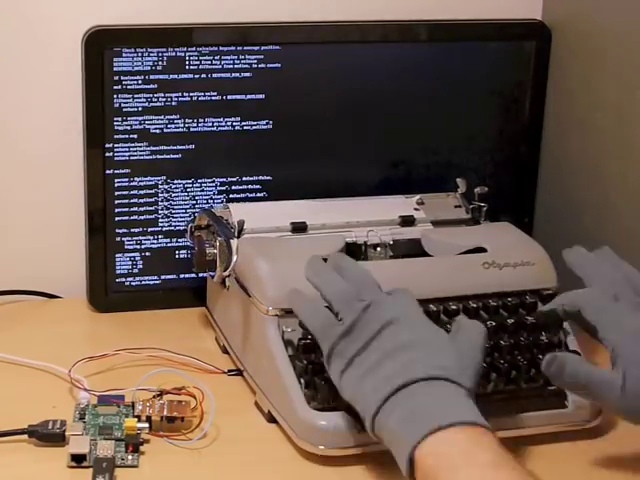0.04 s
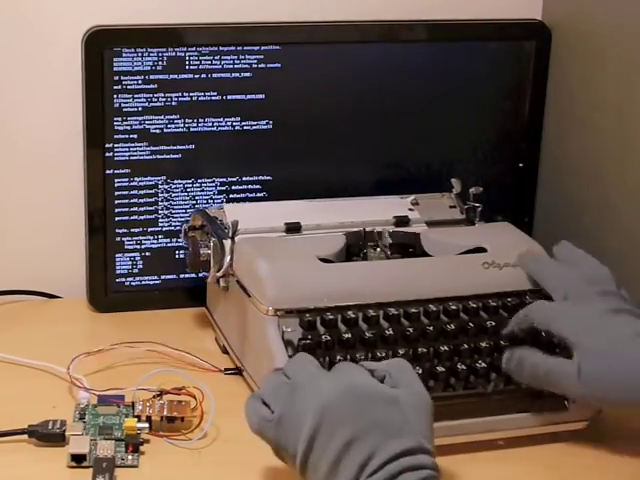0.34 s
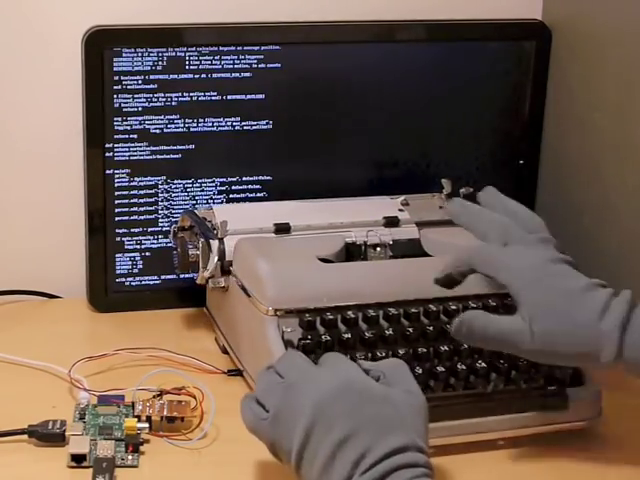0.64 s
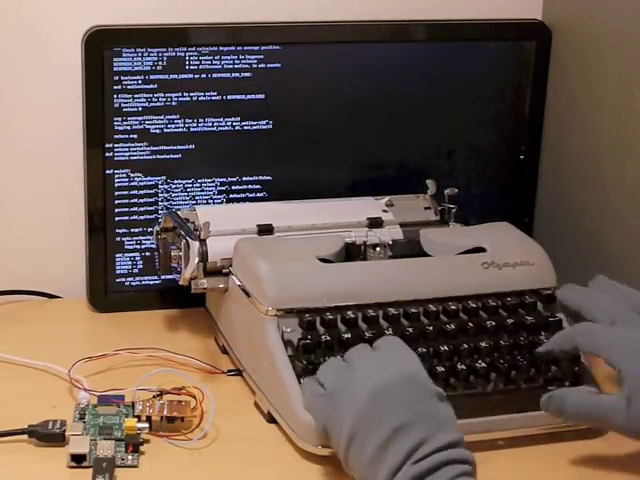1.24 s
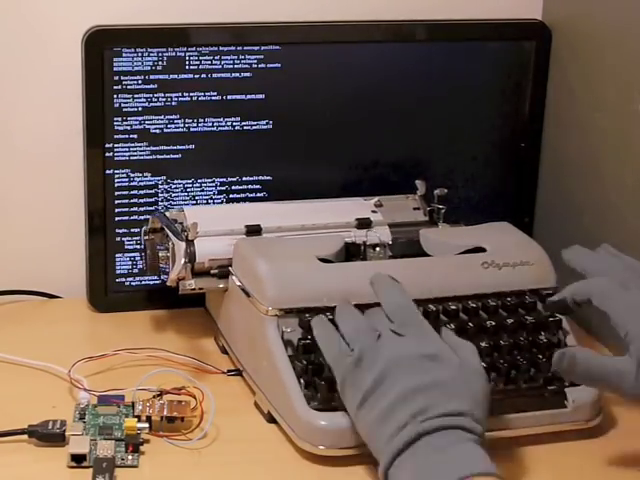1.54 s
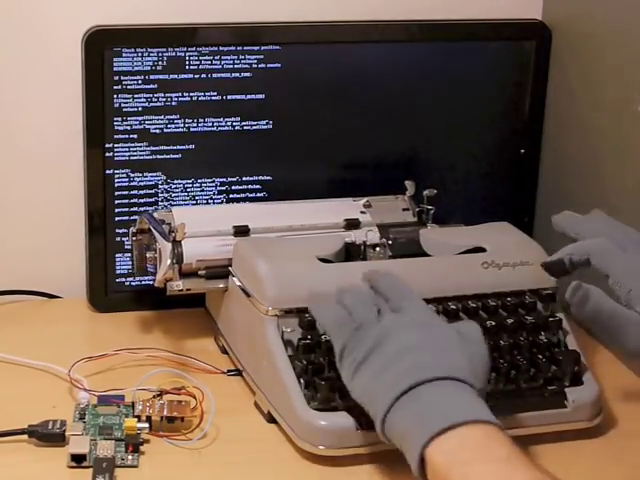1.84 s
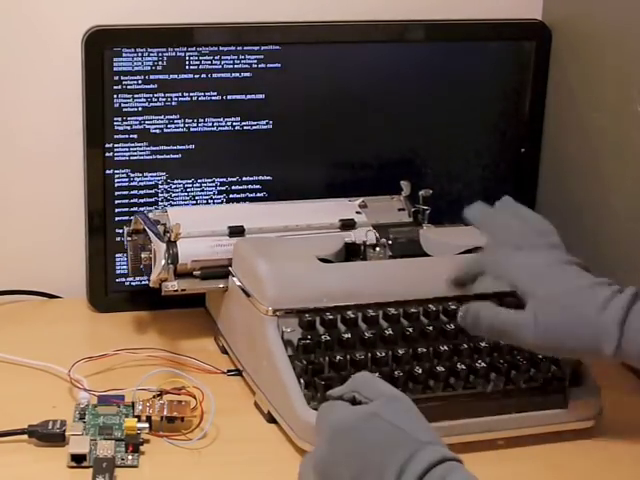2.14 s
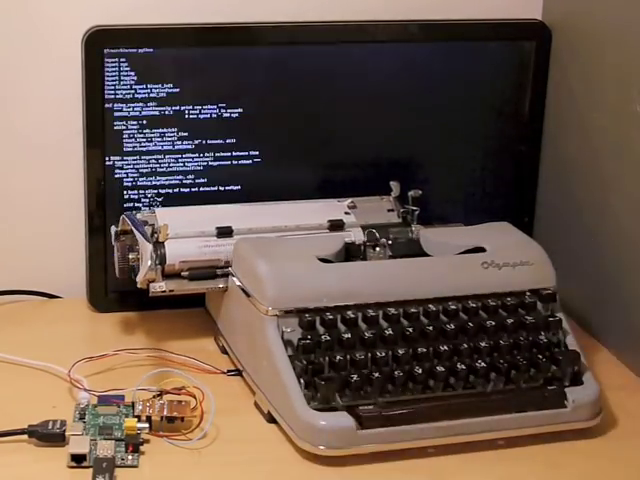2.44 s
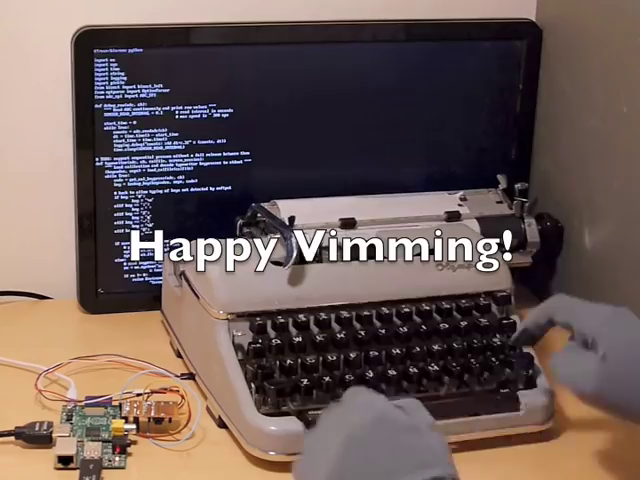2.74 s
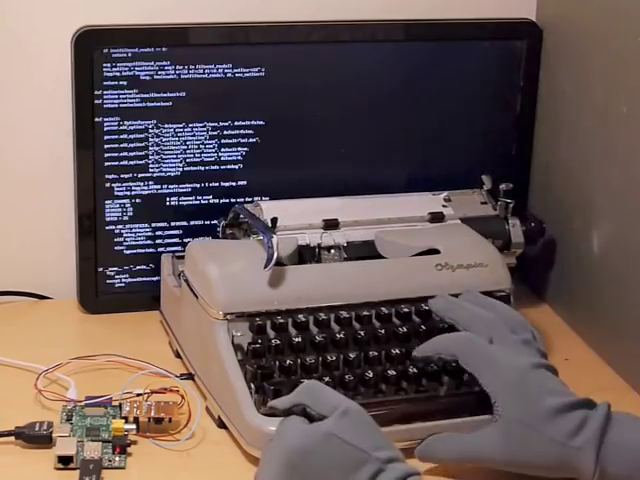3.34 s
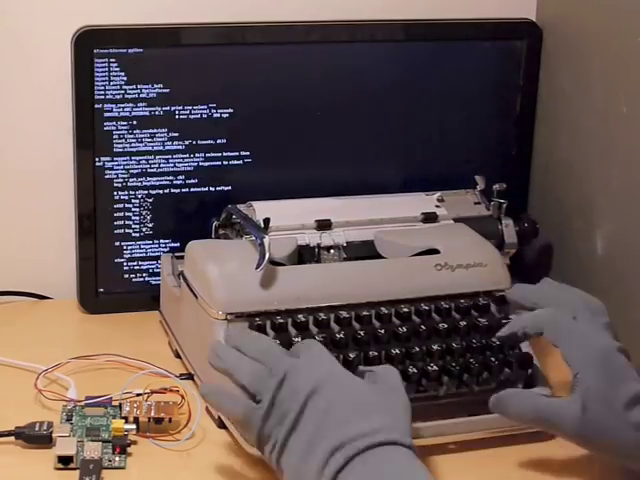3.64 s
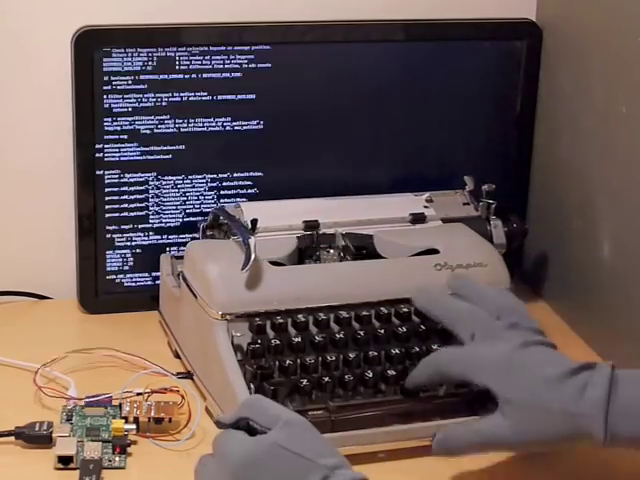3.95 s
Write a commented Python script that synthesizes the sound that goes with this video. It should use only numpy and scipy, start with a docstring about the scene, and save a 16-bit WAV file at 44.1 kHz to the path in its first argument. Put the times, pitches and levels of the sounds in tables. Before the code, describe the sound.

Rapid typing on a manual typewriter, broken by a short carriage clunk and slide.

```python
"""A portable manual typewriter on a wooden desk, heard close over faint room tone, types in quick bursts.
At each key the linkage scrapes, the slug cracks on the platen and thuds the desk, the type bar rattles
and the escapement clicks. Springs ring on between keys. Near 2.4 s the carriage clunks and slides,
its ratchet ticking, and the level dips briefly. At 2.8 s typing resumes on a new line with a boxier
thud, and a last soft clunk comes just before the end."""
import sys
import numpy as np
from scipy.fft import rfft, irfft, next_fast_len
from scipy.io import wavfile
from scipy.ndimage import uniform_filter1d, map_coordinates

SR = 44100
rng = np.random.default_rng(int(sys.argv[2]) if len(sys.argv) > 2 else 0)


def waveform_to_disk(signal):
    """Save audio, clipped to [-1, 1], as 16-bit WAV at the path in sys.argv[1]."""
    frames = np.transpose(np.atleast_2d(signal))
    scaled = np.clip(frames, -1, 1) * 32767
    samples = np.round(scaled).astype(np.int16)
    wavfile.write(sys.argv[1], SR, samples)


N = 176400
HIT_T = np.arange(SR // 10) / SR  # seconds into one hit
CLICK = HIT_T == 0  # a one-sample impulse


def amp(db):
    """Decibels to amplitude."""
    return 10 ** (np.asarray(db) / 20)

def unit(x):
    """Scale to an RMS of one."""
    return x / np.sqrt(np.mean(x ** 2) + 1e-20)

def eq_gain(points, hz):
    """Gain of a (Hz, dB) curve on a log frequency axis."""
    point_hz, db = np.transpose(points)
    return amp(np.interp(np.log(hz + 1), np.log(point_hz + 1), db))

def fader(points, outside_db=None):
    """Gain of a (seconds, dB) curve at every sample."""
    return amp(np.interp(np.arange(N) / SR, *np.transpose(points), left=outside_db, right=outside_db))

def decay(t, t60):
    """Hold until t = 0, then fall 60 dB every t60 seconds."""
    return amp(-60 * np.maximum(t, 0) / t60)

def add(track, start, sound):
    """Mix a sound into a track; start is in seconds."""
    i = max(0, round(start * SR))
    part = track[i:i + len(sound)]
    part += sound[:len(part)]

def colour(x, points):
    """Minimum-phase EQ with unit power gain: only the curve's shape counts."""
    size = 2 * next_fast_len(N // 2 + SR // 8)
    gain = unit(eq_gain(points, np.fft.rfftfreq(size, 1 / SR)))
    cepstrum = irfft(np.log(gain + 1e-6), size)
    cepstrum[1:size // 2] *= 2
    cepstrum[size // 2 + 1:] = 0
    return irfft(rfft(x, size) * np.exp(rfft(cepstrum)), size)[..., :N]

def burst(envelope, rough=0):
    """Noise with its envelope's shape and energy; roughness clumps it into tiny contacts."""
    white, clumps = rng.standard_normal((2, len(envelope)))
    grit = np.exp(rough * unit(uniform_filter1d(clumps, size=24)))
    return unit(white * envelope * grit) * np.sqrt(np.mean(envelope ** 2))

def ring(modes, t, t60, scatter_db, detune):
    """Decaying (Hz, dB) modes, excited a little differently at every blow."""
    hz, db = np.transpose(modes)[:, :, None]
    level_draw, pitch_draw, phase = rng.standard_normal((3, len(hz), 1))
    partials = np.sin(2 * np.pi * (hz * (1 + detune * pitch_draw) * t + phase))
    return decay(t, t60) * np.sum(amp(db + scatter_db * level_draw) * partials, axis=0)


# The room's colour. Each row: frequency in Hz, relative level in dB.
ROOM_EQ = [(25, -3), (250, -9.5), (4000, 0), (15000, -26.5)]

def room_tone():
    """A steady bed of faint rumble and hiss."""
    return amp(-64) * colour(rng.standard_normal(N), ROOM_EQ)


# The typing, with levels before each layer's trim. Each row: start in seconds, slug level in dB,
# escapement delay in seconds, escapement level in dB, thud level in dB.
KEYS = [(0.0942, -23, 0.0075, -34.5, -54.5), (0.1441, -23, 0.005, -30, -54.5),
        (0.339, -26.5, 0.007, -29.5, -56), (0.4285, -25.5, 0.0093, -33.5, -53),
        (0.5266, -23, 0.01, -27, -55), (0.5974, -23.5, 0.0067, -24.5, -69),
        (0.6337, -20.5, 0.0068, -24.5, -48), (0.7174, -23, 0.0078, -24.5, -57),
        (0.8217, -23, 0.011, -26, -58), (0.9475, -23.5, 0.0076, -24, -59),
        (1.0443, -22, 0.0073, -24, -48.5), (1.1102, -24.5, 0.0097, -26, -50),
        (1.2063, -22.5, 0.0073, -27.0, -56.0), (1.2296, -20.5, 0.0087, -29, -52.5),
        (1.2679, -21.5, 0.0079, -29, -57), (1.3738, -21.5, 0.0086, -28.5, -54),
        (1.4466, -21.5, 0.0077, -26.5, -54.5), (1.4799, -20, 0.0074, -23, -46),
        (1.555, -24.5, 0.007, -23.5, -52.5), (1.6071, -23.5, 0.0073, -26, -48),
        (1.6638, -23, 0.0099, -27, -52), (1.702, -25.5, 0.008, -26, -49),
        (1.7348, -24.5, 0.0091, -31.5, -50.5), (1.8684, -25.5, 0.0085, -22, -60),
        (1.899, -28, 0.0079, -24, -52), (1.9371, -24.5, 0.0088, -30.5, -52), (1.9931, -23, 0.01, -24, -49),
        (2.237, -23.5, 0.0097, -24.5, -50.5), (2.3139, -24, 0.0071, -23, -62),
        (2.3287, -28.5, 0.0066, -22.5, -56), (2.4102, -25.5, 0.0073, -23, -55.5),
        (2.4283, -30, 0.0072, -24, -52.5), (2.8179, -24.0, 0.0069, -30.5, -56.5),
        (2.9089, -25.5, 0.0079, -24.5, -53.5), (2.9408, -23, 0.0065, -26.5, -53.5),
        (2.9878, -25, 0.0064, -30.5, -57.5), (3.0349, -25.5, 0.0071, -29.0, -57),
        (3.0964, -21, 0.0066, -30.5, -54.5), (3.2065, -21.5, 0.0073, -24.5, -55.5),
        (3.3119, -23.5, 0.007, -24, -60.5), (3.4884, -21.5, 0.0082, -24.5, -58),
        (3.6396, -21.5, 0.0043, -32.5, -50.5), (3.708, -21, 0.004, -27, -48.5),
        (3.7654, -22.5, 0.0051, -30.5, -52), (3.8137, -25, 0.0052, -23.5, -48.5),
        (3.8487, -21.5, 0.0046, -23, -55), (3.917, -24.5, 0.0065, -30.0, -49.5)]
# The scrape's colour. Each row: frequency in Hz, relative level in dB.
LINKAGE_EQ = [(400, -29), (900, -13.5), (1700, -3), (2800, -12), (4300, -9.5), (5500, -13.5), (6250, 1.5),
              (7000, -11), (7800, -4), (10000, -9.5), (16000, -12)]

def linkage():
    """The linkage scrapes as it moves, just before the slug lands."""
    lead_s = 0.0018
    scrapes = np.zeros(N)
    for start, slug_db, *_ in KEYS:
        scrape = burst(decay(HIT_T - lead_s, t60=0.0082), rough=0.23)
        add(scrapes, start - lead_s, force(slug_db) * amp(-5) * scrape)
    return colour(scrapes, LINKAGE_EQ)

def force(slug_db):
    """A stroke's strength: halfway in dB between its slug and the average one."""
    return amp((slug_db + np.mean([key[1] for key in KEYS])) / 2)


# The crack's colour. Each row: frequency in Hz, relative level in dB.
SLUG_EQ = [(300, -24), (850, -10.5), (1700, -26.5), (3600, -18.5), (4800, 3.5), (5500, -8), (6350, 9.5),
           (7000, -3), (7900, 7), (9000, -14), (10700, -2.5), (11850, 6.5), (12800, -5), (14800, 2),
           (16500, -52)]

def slugs():
    """The type slug cracks on the platen: a hard click and a spit of noise."""
    cracks = np.zeros(N)
    for start, slug_db, *_ in KEYS:
        crack = amp(16.5) * CLICK + amp(3) * burst(decay(HIT_T, t60=0.0018))
        add(cracks, start, amp(slug_db) * crack)
    return colour(cracks, SLUG_EQ)


# The thud, deep late in a line and boxier early in the next.
# Each row: frequency in Hz, relative level in dB.
DEEP_DESK_EQ = [(25, -6), (170, -3.5), (320, -5), (600, -7.5), (1200, -10.5), (3000, -65)]
BOXY_DESK_EQ = [(25, 3.5), (180, -6), (330, -12), (520, 3), (1200, -7), (3000, -47.5)]
NEW_LINE_S = 2.66

def desk_thuds():
    """Each blow pushes the machine into the desk, which rumbles briefly."""
    deep, boxy = np.zeros((2, N))
    for start, *_, thud_db in KEYS:
        blow = amp(30) * CLICK + amp(3) * burst(decay(HIT_T, t60=0.027))
        add(deep if start < NEW_LINE_S else boxy, start, amp(thud_db) * blow)
    return colour(deep, DEEP_DESK_EQ) + colour(boxy, BOXY_DESK_EQ)


# The colour of rattling steel. Each row: frequency in Hz, relative level in dB.
RATTLE_EQ = [(300, -24.5), (900, -28), (1500, -13), (2400, -6.5), (3300, -7.5), (4000, -1.5), (5300, -5.5),
             (7900, -6), (10000, -5), (13000, -7.5), (15300, -10), (16500, -49)]

def type_bars():
    """Each bar rings at four random pitches and rattles until just after the escapement catches."""
    pitch_range_hz, take_up_s = (1899, 6984), 0.0049
    rings, rattles = np.zeros((2, N))
    for start, slug_db, delay, *_ in KEYS:
        modes = [(hz, 0) for hz in np.exp(rng.uniform(*np.log(pitch_range_hz), size=4))]
        tone = ring(modes, HIT_T, t60=0.05, scatter_db=0.5, detune=0)
        add(rings, start, force(slug_db) * amp(-16) * tone)
        loose = decay(HIT_T, t60=0.073) * decay(HIT_T - delay - take_up_s, t60=0.015)
        add(rattles, start, force(slug_db) * amp(-4.5) * burst(loose, rough=0.25))
    return rings + colour(rattles, RATTLE_EQ)


# The springs' shimmer and the rasp's colour. Each row: frequency in Hz, relative level in dB.
SHIMMER_EQ = [(1200, -23), (1650, -1), (2650, -3.5), (4300, -12.5), (6100, 0.5), (7000, -9.5),
              (11500, -11.5), (15500, -13.5)]
RASP_EQ = [(1200, -35), (2100, -5), (2650, -6), (3260, 3), (3550, -13), (3850, -3), (5000, -8.5),
           (9400, -13), (15500, -29)]
# The rasp's swell. Each row: time in seconds, level in dB.
RASP_LEVEL = [(0.3, -63), (2.0, -64), (2.35, -53.5), (2.85, -58.5), (3.18, -51.5), (3.5, -51.5),
              (3.95, -60.5)]

def metalwork():
    """Every stroke shakes dozens of springs and idle bars, which shimmer over a faint metallic rasp."""
    t = np.arange(SR) / SR
    shaken = np.zeros(N)
    for start, *_ in KEYS:
        add(shaken, start, burst(decay(t, t60=1.1)))
    shimmer = amp(-63) * colour(shaken, SHIMMER_EQ)
    rasp = colour(burst(fader(RASP_LEVEL), rough=0.25), RASP_EQ)
    # the metal's many close resonances ripple the spectrum
    hz = np.linspace(1000, 16000, num=450)
    ripple_db = 4.5 * rng.standard_normal(len(hz)) * (hz > hz[0])
    return colour(shimmer + rasp, np.column_stack([hz, ripple_db]))


# The clearest springs. Each row: pitch in Hz, typical level in dB.
SPRING_MODES = [(1922, -73), (2400, -71), (2638, -64), (3391, -67), (4740, -67), (4996, -68), (6115, -67)]
# Pings that stand out. Each row: start in seconds, pitch in Hz, level in dB.
SPRING_PINGS = [(0.2, 1604, -56), (0.428, 4996, -49.5), (0.634, 6130, -49), (0.73, 1715, -52.5),
                (1.735, 4992, -41), (1.735, 6778, -42)]

def springs():
    """A few springs sing clear notes after every stroke, with the odd brighter ping."""
    t = np.arange(SR) / SR
    notes = np.zeros(N)
    for start, *_ in KEYS:
        add(notes, start, ring(SPRING_MODES, t[:SR // 2], t60=0.54, scatter_db=5, detune=0.001))
    for start, hz, db in SPRING_PINGS:
        add(notes, start, amp(db) * decay(t, t60=0.22) * np.sin(2 * np.pi * hz * t))
    return notes


# The escapement pawl's modes. Each row: pitch in Hz, relative level in dB.
PAWL_MODES = [(1650, -14), (4020, -19), (5750, -4.5), (6300, 0), (7720, 2), (8150, 0), (8950, -0.5),
              (9550, -3.5), (10900, -6), (11800, -12.5), (13300, -10)]

def escapement():
    """The pawl catches a few milliseconds after the slug, and the case answers briefly."""
    clicks, rings = np.zeros((2, N))
    for start, slug_db, delay, pawl_db, _ in KEYS:
        click = amp(pawl_db - 5.5) * burst(decay(HIT_T, t60=0.022), rough=0.25)
        case = force(slug_db) * amp(-16.5) * burst(decay(HIT_T, t60=0.065))
        add(clicks, start + delay, click + case)
        for trim_db, t60 in (-15, 0.015), (-22.5, 0.043):  # a tight snap, then a faint ring
            tone = unit(ring(PAWL_MODES, HIT_T, t60, scatter_db=1.0, detune=0.0042))
            add(rings, start + delay, amp(pawl_db + trim_db) * tone)
    return rings + colour(clicks, RATTLE_EQ)


# Carriage clunks and ratchet ticks. Each row: start in seconds, relative level in dB.
CLUNKS = [(2.378, -32.5), (2.476, -24.5), (3.961, -46.5)]
TICKS = [(2.5467, -36), (2.578, -42.5)]
# The slide's swell. Each row: time in seconds, level in dB.
SLIDE_LEVEL = [(2.44, -75), (2.515, -40.5), (2.56, -56.5), (2.62, -46.5), (2.67, -67), (2.75, -55),
               (2.88, -77)]
# The colours of clunk and rail. Each row: frequency in Hz, relative level in dB.
CLUNK_EQ = [(700, -34), (1400, 3.5), (1850, -6), (2400, 1.5), (3200, -15), (4200, -7.5), (7000, -29)]
RAIL_EQ = [(700, -27), (1900, -3.5), (6000, -2.5), (15000, -13)]

def carriage():
    """The carriage clunks against its stops and slides on its rail, the ratchet ticking."""
    clunks, ticks = np.zeros((2, N))
    for start, db in CLUNKS:
        add(clunks, start, amp(db) * (amp(20.5) * CLICK + burst(decay(HIT_T, t60=0.016))))
    for start, db in TICKS:
        add(ticks, start, amp(db) * burst(decay(HIT_T, t60=0.05), rough=0.25))
    slide = burst(fader(SLIDE_LEVEL, outside_db=-120), rough=0.25)
    return colour(clunks, CLUNK_EQ) + colour(ticks, RATTLE_EQ) + colour(slide, RAIL_EQ)


# Reflections from the near walls. Each row: frequency in Hz, average gain in dB.
WALL_EQ = [(100, -11), (600, -7.5), (1500, -19), (7500, -23), (13000, -14)]

def walls(direct):
    """Reflections reach left and right out of step, differently at every stroke."""
    knots = np.arange(N) * 50 / SR  # 50 random values a second
    drift = unit(map_coordinates(rng.standard_normal(int(knots[-1]) + 4), [knots]))
    size = next_fast_len(N + SR // 4)
    gain = eq_gain(WALL_EQ, np.fft.rfftfreq(size, 1 / SR))
    side = irfft(1j * rfft(direct * drift, size) * gain, size)[:N]  # a quarter cycle out of phase
    return np.array([direct + side, direct - side])


def scene():
    """The typewriter over the room tone, spread into stereo by the walls."""
    return walls(room_tone() + linkage() + slugs() + desk_thuds() + type_bars()
                 + metalwork() + springs() + escapement() + carriage())


# The dip between the two lines. Each row: time in seconds, gain in dB.
LEVEL_DIP = [(2.57, -1.5), (2.615, -11.5), (2.645, -16), (2.662, -32), (2.68, -16), (2.71, -7.5),
             (2.75, -1)]
TOP_HZ = 15900

def record(dry):
    """The level dips briefly, and a steep low-pass shaves off the very top."""
    size = next_fast_len(N + SR // 4)
    low_pass = 1 / np.sqrt(1 + (np.fft.rfftfreq(size, 1 / SR) / TOP_HZ) ** 120)
    return irfft(rfft(dry * fader(LEVEL_DIP), size) * low_pass, size)[:, :N]


dry = scene()
out = record(dry)
waveform_to_disk(out)
```